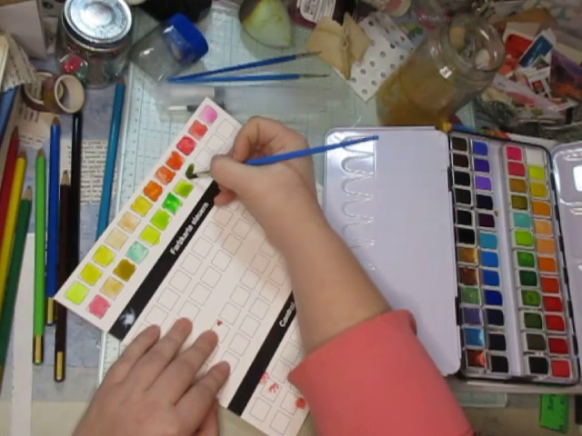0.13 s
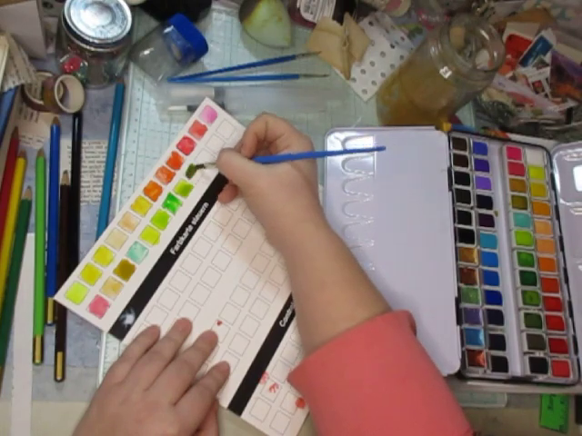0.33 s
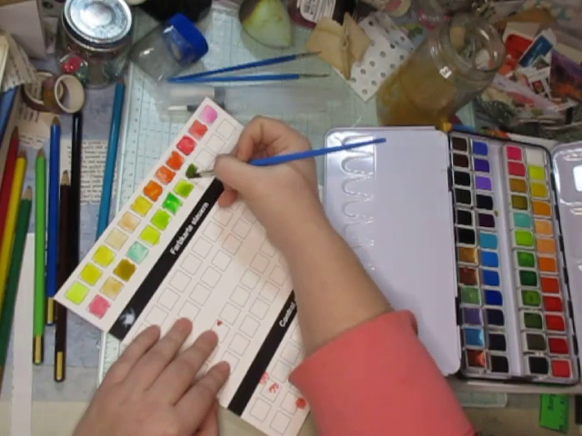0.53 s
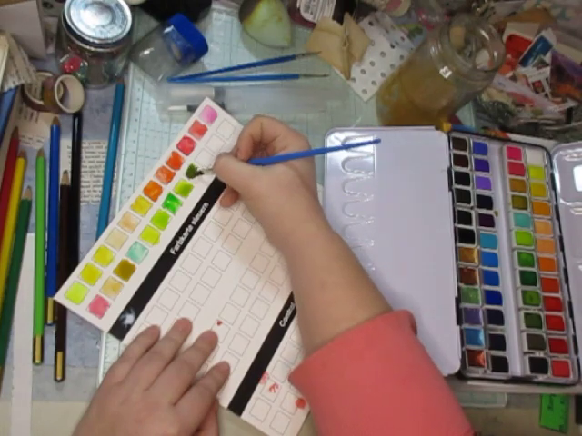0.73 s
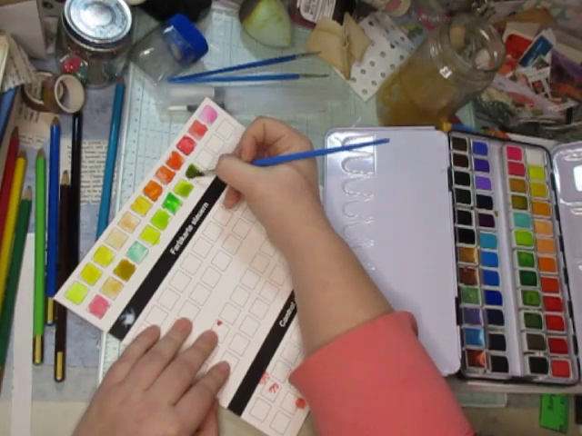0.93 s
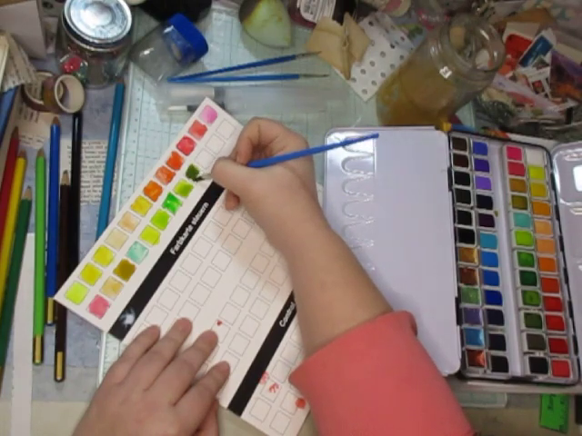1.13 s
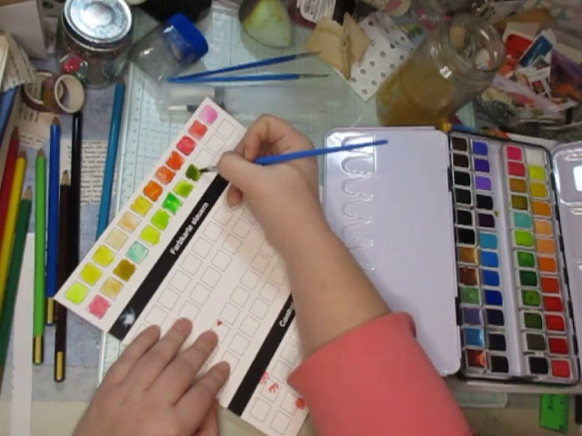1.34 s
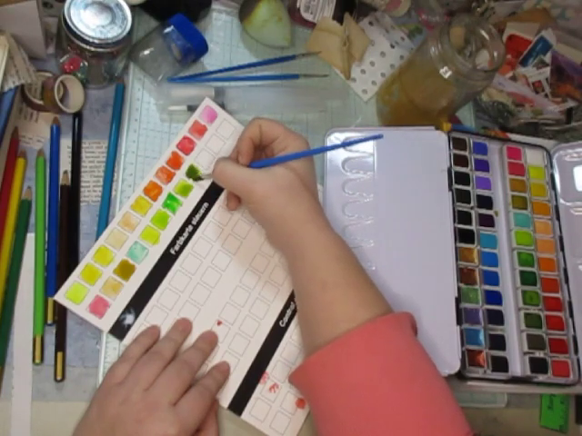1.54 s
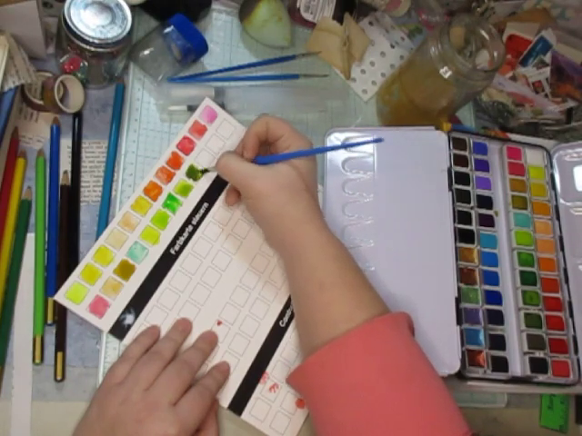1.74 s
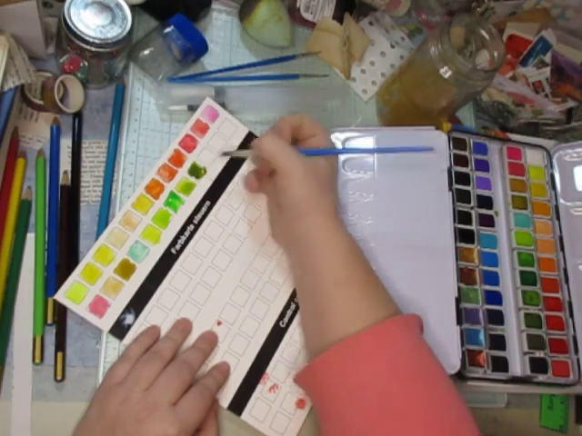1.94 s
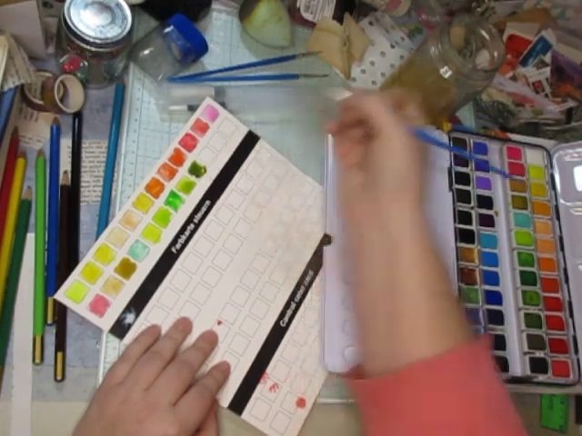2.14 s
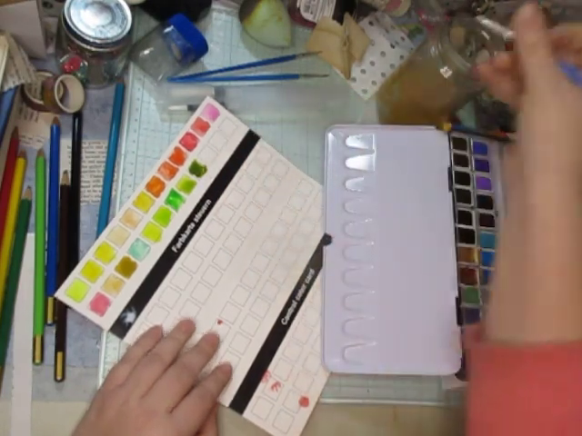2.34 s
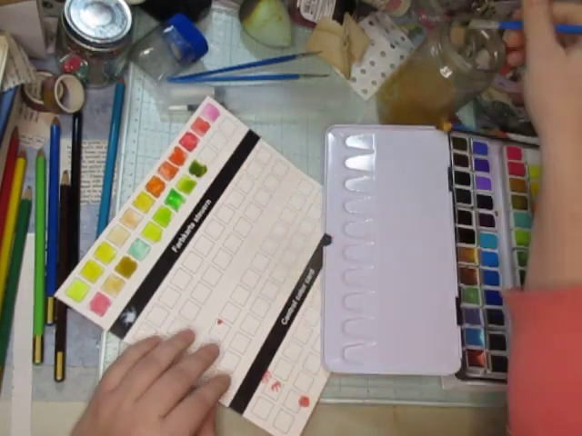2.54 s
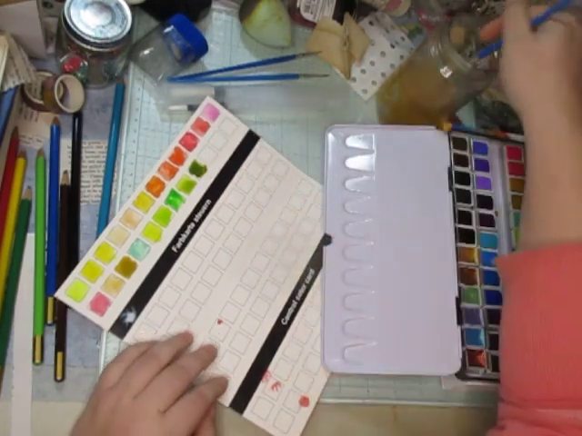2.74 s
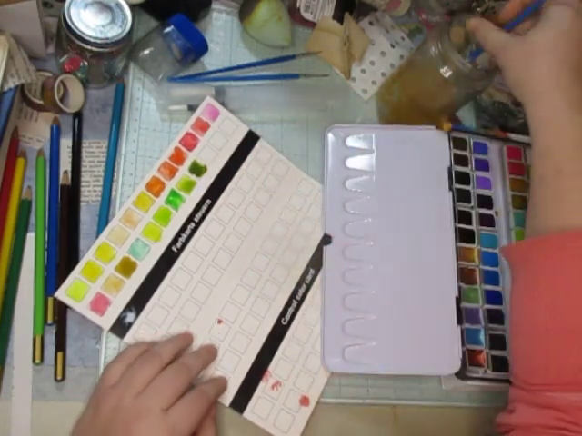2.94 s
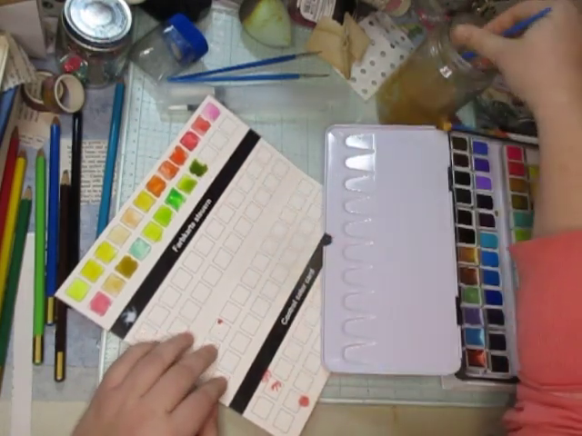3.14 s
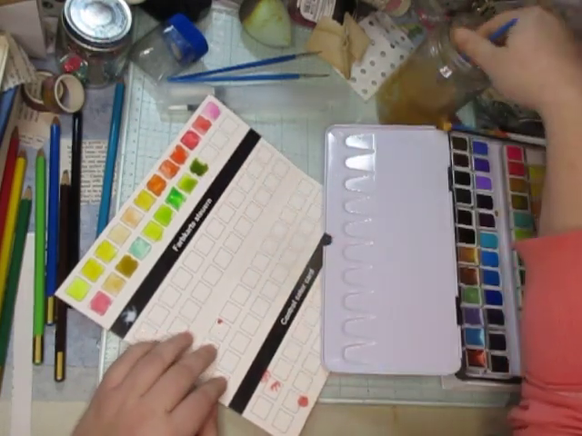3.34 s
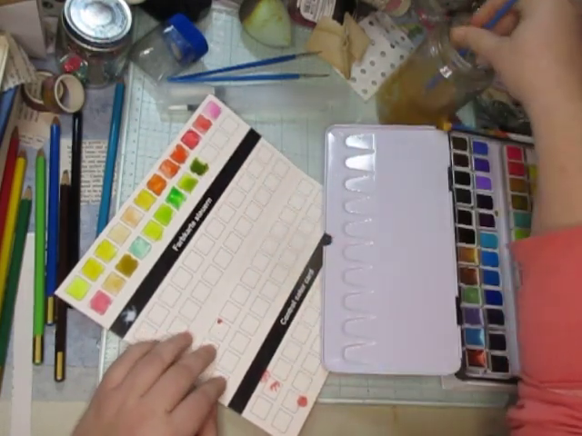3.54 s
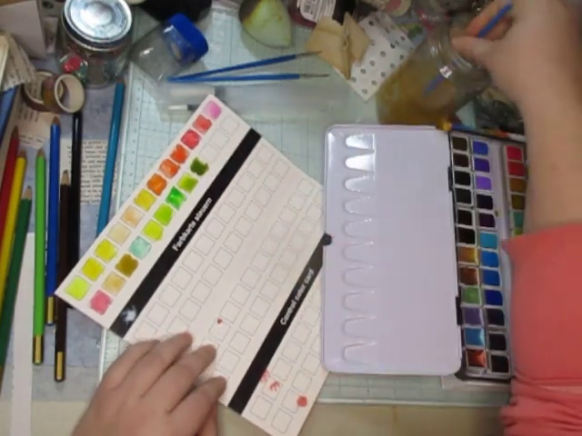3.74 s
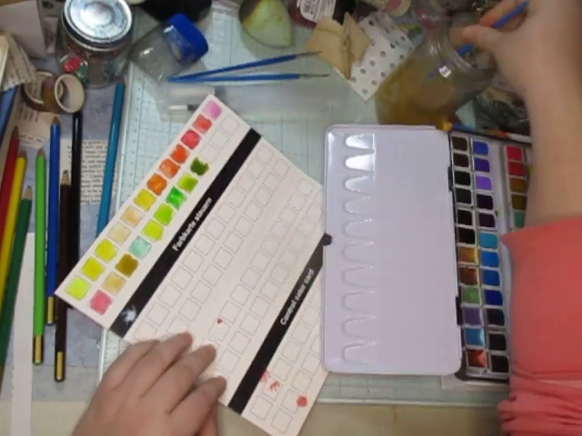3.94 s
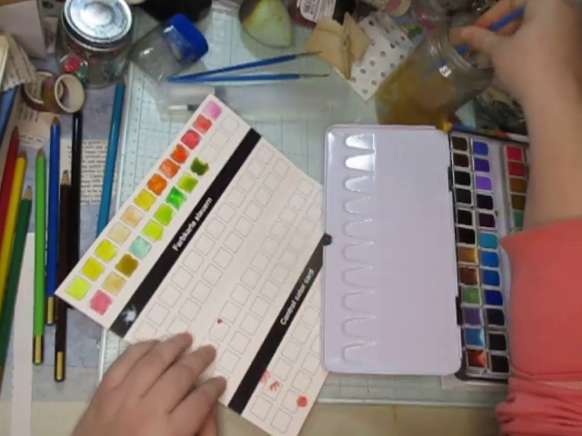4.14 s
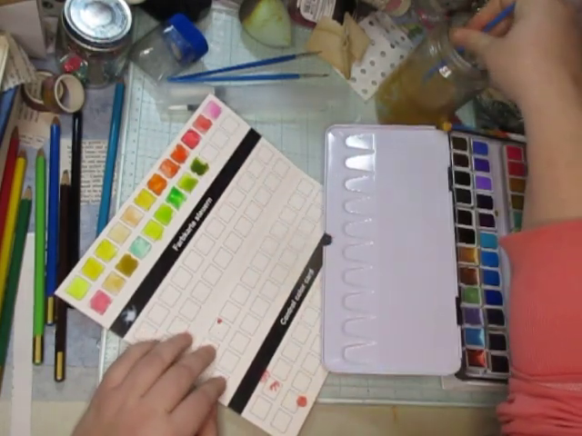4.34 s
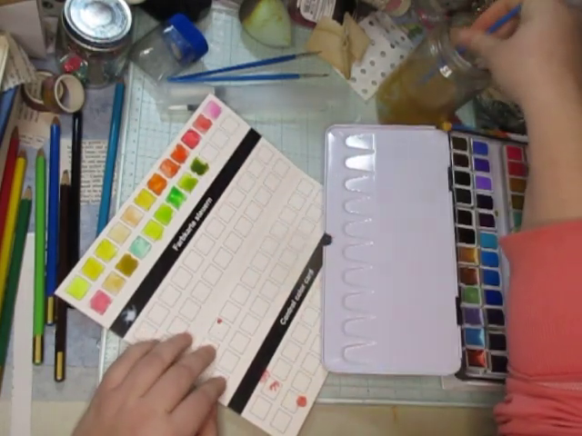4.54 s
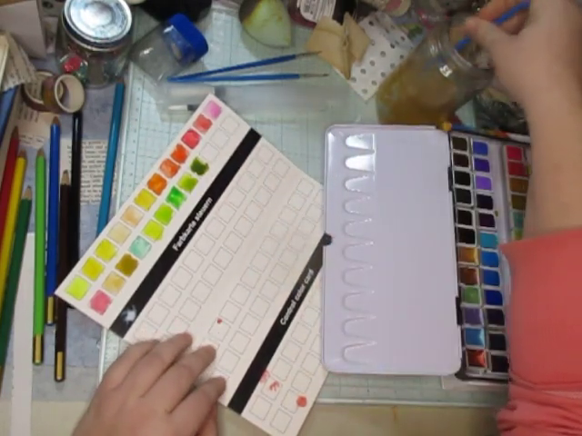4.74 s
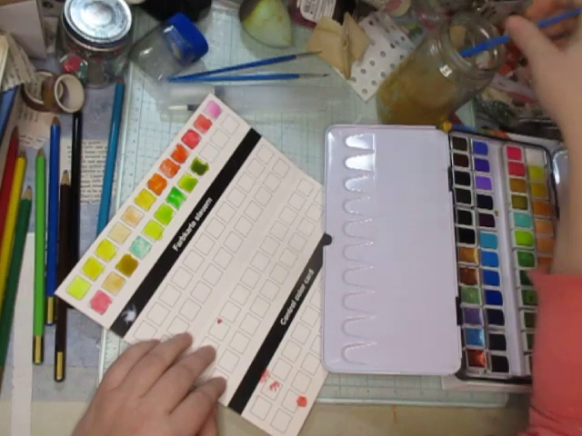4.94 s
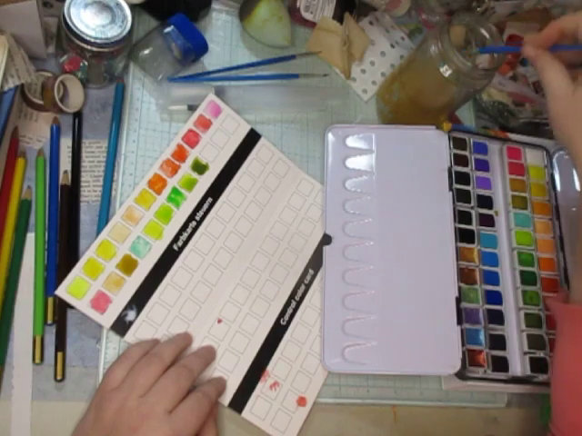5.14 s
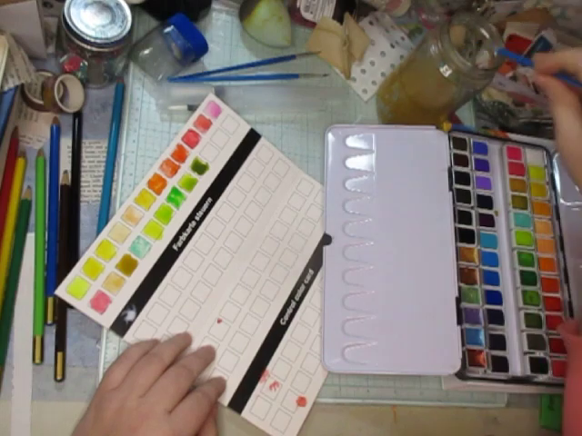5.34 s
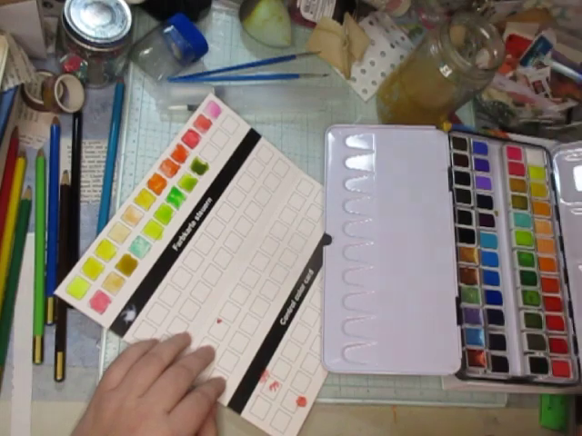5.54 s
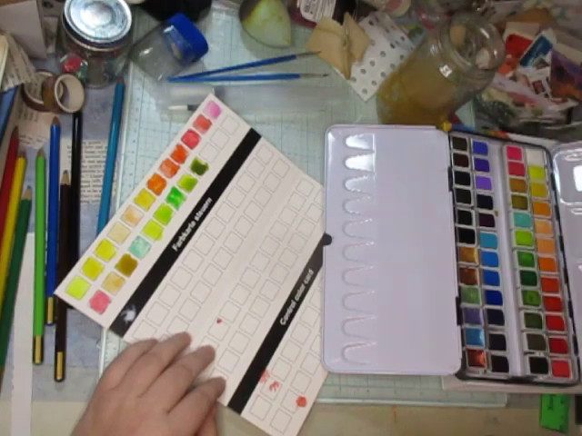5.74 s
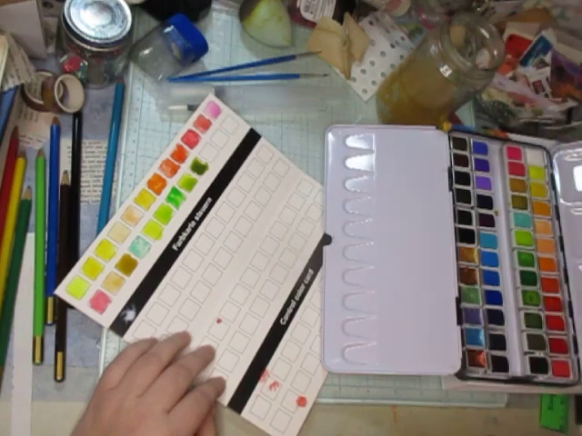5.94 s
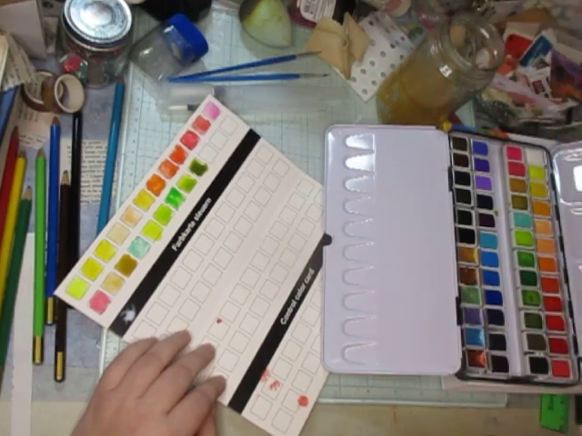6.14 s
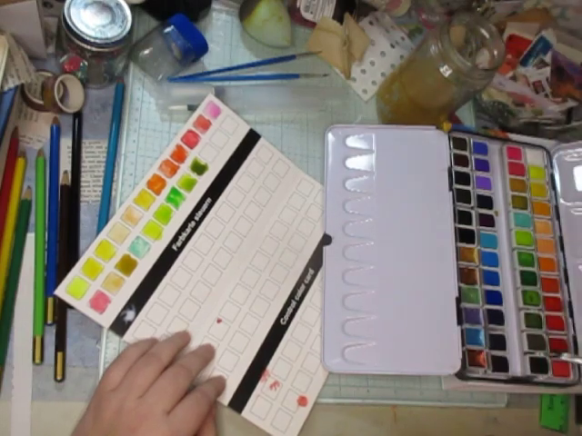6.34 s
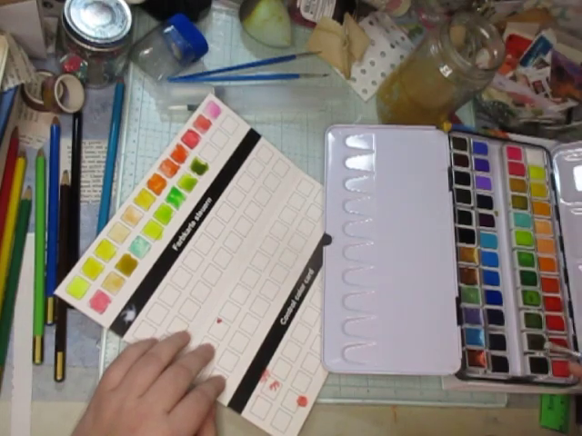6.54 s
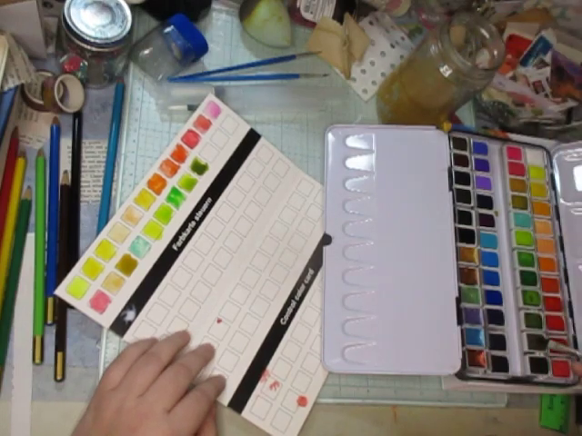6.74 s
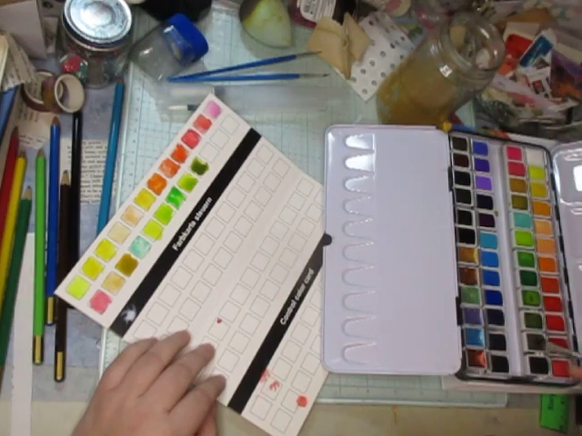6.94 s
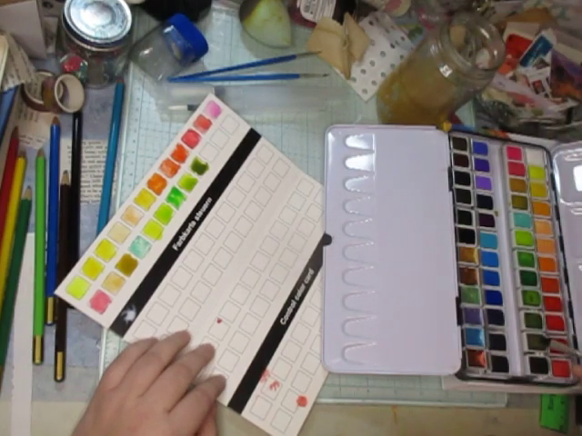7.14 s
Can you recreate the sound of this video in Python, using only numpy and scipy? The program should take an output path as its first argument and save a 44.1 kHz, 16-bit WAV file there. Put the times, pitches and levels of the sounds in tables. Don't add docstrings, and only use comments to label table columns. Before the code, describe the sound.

Over a steady fan whir and low electrical hum, a wooden brush handle knocks sharply inside a glass water jar, ending with one clear clink.

```python
import sys
import numpy as np
from scipy import signal
from scipy.fft import rfft, irfft
from scipy.io import wavfile
from scipy.ndimage import uniform_filter1d

SR = 44100
rng = np.random.default_rng(int(sys.argv[2]) if len(sys.argv) > 2 else 0)


def inscribe(sig):
    pcm = np.round(np.clip(np.atleast_2d(sig).T, -1, 1) * 32767)
    wavfile.write(sys.argv[1], SR, pcm.astype(np.int16))


def linear_from_db(decibels):
    return 10 ** (np.asarray(decibels, float) / 20)


N = 317816


def evened(x):
    return x / np.sqrt(np.mean(x ** 2) + 1e-20)


def read(points, hz):
    f, value = np.transpose(points)
    return np.interp(np.log(hz + 1), np.log(f + 1), value)


def add(mix, s, sound):
    part = mix[round(s * SR):][:len(sound)]
    part += sound[:len(part)]


def resonate(x, hz, width):
    turn = np.exp(2j * np.pi * np.cumsum(hz * np.ones(len(x))) / SR)
    r = np.exp(-np.pi * width / SR)
    smooth = signal.lfilter([1 - r], [1, -r], x / turn + 1e-18)
    return 2 * (turn * smooth).real


def coloured(points):
    hz = np.fft.rfftfreq(N, 1 / SR)
    spectrum = rfft(rng.standard_normal(N)) * linear_from_db(read(points, hz))
    return evened(irfft(spectrum, N))


def drift(top_hz):
    t = np.arange(0, N + 512, 512) / SR
    slow = 0
    for f in np.geomspace(top_hz / 20, top_hz, num=20):
        slow = slow + np.sin(2 * np.pi * (f * t + rng.random())) / np.sqrt(f)
    return np.interp(np.arange(N) / SR, t, evened(slow))


def ring(hz, db, t60, size, phase=0):
    t = np.arange(size)[:, None] / SR
    tones = linear_from_db(db - 60 * t / t60) * np.sin(2 * np.pi * hz * t + phase)
    return tones.sum(1)


def swish(rows, spread):
    s, db, hz = np.transpose(rows)
    t = np.arange(s[0], s[-1], 1 / SR)
    grain_db = 1.5 * evened(uniform_filter1d(rng.standard_normal(len(t)), size=90))
    rub = rng.standard_normal(len(t)) * linear_from_db(grain_db)
    for _ in range(2):
        rub = resonate(rub, np.interp(t, s, hz), spread * hz.mean())
    loudness = linear_from_db(np.interp(t, s, db))
    return s[0], loudness * evened(rub) * signal.windows.tukey(len(t), .2)


def fan():
    # (pitch [Hz], width [Hz], level [dB])
    housing = [(842, 59, -0.5), (998.5, 170, 4.5), (1204, 224, 6.5), (1422.4, 114, 4.5), (1658, 105, -1),
               (2025, 18, -12), (359.5, 5.7, -15), (706.5, 22, -14)]
    # (frequency [Hz], level [dB])
    rumble = [(20, -1), (48, -1.5), (59, 4), (70, -4), (100, -1), (150, -4), (250, -7.5), (550, -13.5),
              (900, -9), (2300, -28), (4000, -43)]
    air = rng.standard_normal(N)
    whir = np.zeros(N)
    for hz, width, db in housing:
        width = 1.21 * width
        hollow = resonate(resonate(air, hz, width), hz, width)
        whir += linear_from_db(db) * evened(hollow)
    whir_db = -47 + 0.15 * drift(5.9)
    return linear_from_db(whir_db) * evened(whir) + linear_from_db(-52) * coloured(rumble)


def hum():
    # (frequency [Hz], level [dB rms])
    hum_tones = [
        (119.95, -39.7),
        (15734.04, -87.3),
        (15747.5, -91),
    ]
    t = np.arange(N) / SR
    tones = np.zeros(N)
    for hz, db in hum_tones:
        tones += linear_from_db(db) * np.sqrt(2) * np.sin(2 * np.pi * hz * (t - .052))
    return tones * linear_from_db(0.16 * drift(2.3))


def lens_motor():
    # (frequency [Hz], decay time t60 [s], level [dB])
    tick_tones = [(1500, .007, 0), (2200, .004, -2), (2850, .009, -3), (3800, .0025, -2), (5300, .0025, -3),
                  (6800, .003, -4), (8500, .002, -7)]
    # (time of second step [s], gap after the first [s], peak level [dB])
    focus_runs = [
        (.131, .041, -44),
        (.399, .048, -42),
        (2.7001, .047, -41.5),
        (3.3014, .042, -42),
    ]
    # (delay [s], delay [s])
    run_delays = (.025, .066)
    # (first [dB], second [dB], third [dB], fourth [dB])
    run_levels = (-.5, -.5, -.5, -1.5)
    # (time [s], peak level [dB])
    steps = [
        (2.4334, -50),
        (2.467, -47),
        (2.82, -50),
        (2.8334, -47),
        (2.8494, -43),
        (2.933, -45),
        (3.234, -40),
        (3.509, -42.5),
    ]
    hz, t60, db = np.transpose(tick_tones)
    tick = ring(hz, db, t60, size=900)
    tick = tick / abs(tick).max()
    out = np.zeros(N)
    for s, gap, peak_db in focus_runs:
        for delay, more_db in zip((-gap, 0, *run_delays), run_levels):
            add(out, s + delay, linear_from_db(peak_db + more_db + 8.0) * tick)
    for s, peak_db in steps:
        add(out, s, linear_from_db(peak_db + 8.0) * tick)
    return out


def brush_strokes():
    # (time of the middle [s], peak level [dB], resonance [Hz])
    strokes = [
        (.25, -69, 5200),
        (.77, -70, 5200),
        (1.27, -68, 5270),
        (1.72, -67, 5250),
        (1.96, -68, 8500),
    ]
    half_s, ends_db = .09, -6
    out = np.zeros(N)
    for s, db, hz in strokes:
        rows = [(s - half_s, db + ends_db, hz), (s, db, hz), (s + half_s, db + ends_db, hz)]
        add(out, *swish(rows, .17))
    return out


def sloshes():
    # (start [s], length [s], peak level [dB], first pitch [Hz], last pitch [Hz])
    pushes = [
        (2.815, 0.066, -60, 2800, 3200),
        (3.6, 0.49, -54.5, 420, 520),
        (4.017, 0.11, -56, 2650, 3400),
        (4.509, 0.046, -39.5, 2540, 3400),
        (4.535, .024, -61, 4500, 4700),
        (4.604, 0.084, -51, 3320, 2200),
        (4.646, 0.05, -47.5, 2250, 3560),
    ]
    rise = 0.26
    out = np.zeros(N)
    for s, length, db, from_hz, to_hz in pushes:
        start = (s, db - 6, from_hz)
        top = (s + rise * length, db, from_hz + rise * (to_hz - from_hz))
        end = (s + length, db - 16, to_hz)
        add(out, *swish([start, top, end], 0.32))
    return out


def clatter(mode_hz, mode_db, size):
    # (frequency [Hz], level [dB])
    colour = [(150, 0), (300, -2), (600, 2.5), (1000, -3), (2200, -8), (4300, 1), (4800, -3), (8000, -1),
              (11000, -4), (15000, -26)]
    # (frequency [Hz], decay time t60 [s])
    decay = [(150, 0.47), (500, 0.23), (1500, 0.49), (2600, 0.14), (4000, 0.15), (6000, 0.062),
             (12000, 0.057)]
    hz, t, z = signal.stft(rng.standard_normal(size), SR, nperseg=256, noverlap=224)
    colour_db = read(colour, hz) + np.interp(hz, mode_hz, uniform_filter1d(mode_db, size=5))
    z = z * linear_from_db(colour_db[:, None] - 60 * t / read(decay, hz)[:, None])
    return signal.istft(z, SR, nperseg=256, noverlap=224)[1][:size]


def wood_crack(t):
    u = t * 1500 - 1.3
    crack = np.exp(-3.5 * u ** 2) * (np.sin(2 * np.pi * u) + 0.59 * np.sin(2 * np.pi * 2.15 * u))
    crack = crack + linear_from_db(-13) * np.roll(crack, round(.0033 * SR))
    return crack / crack.max()


def knock(side, ring_db, rise_ms, dull_db, crack_db):
    # (frequency [Hz], decay time t60 [s], mean
    # level [dB], swing of the level with the side struck [dB], loudest side [turns])
    table_top = [
        (303, .17, -6.5, 8, .66),
        (433, .18, -18, 20, .26),
    ]
    jar_modes = [(630, .07, -6.5, 5.5, .68), (752, .16, -2.5, 8.5, .25), (825, .08, -13, 15.5, .25),
                 (940, .13, -5.5, 4.5, .64), (1038, .14, -6, 3, .2), (1165, .1, -8.5, 13, .89),
                 (1205, .08, -8, 2.5, .8), (1290, .08, -10.5, 4, .9), (1473, .12, -13.5, 7, .78),
                 (1527, .14, -7, 6.5, .98), (1600, .12, -7.5, 1.5, .9), (1782, .14, -13, 4.5, .4),
                 (1880, .11, -13, 3, .5), (2165, .11, -11.5, 7, .69),
                 (2390, .07, -28, 9.5, .55), (2478, .07, -22, 9, .73), (2820, .07, -13, 1.5, .75),
                  (3079, .13, -17.5, 1.5, .4), (3365, .09, -21, 1.5, .04), (3749, .11, -28, 7.5, .81),
                  (4080, .1, -27.5, 6, .55), (4272, .08, -27.5, 4.5, .2), (5373, .13, -37, 5, .5),
                  (6188, .12, -38.5, 5, .27), (6691, .09, -38, 1, .54), (7497, .08, -36.5, 7.5, .3),
                  (8188, .08, -40.5, 5.5, .26), (8965, .07, -44, 6, .3)]
    hz, t60, mean_db, swing_db, loudest = np.transpose(table_top + jar_modes)
    levels = mean_db + swing_db * np.cos(2 * np.pi * (side - loudest))
    t = np.arange(12000) / SR
    phase = 2 * np.pi * rng.random(len(hz))
    table = hz < 500
    glass = ring(hz[~table], levels[~table], t60[~table], size=len(t), phase=phase[~table])
    boom = ring(hz[table], levels[table] + 4.0, 1.13 * t60[table], size=len(t), phase=phase[table])
    boom *= 1 - np.exp(-t / 0.0012)
    rattle = clatter(hz, levels, size=len(t))
    first = SR // 100
    glass = glass + linear_from_db(-7) * rattle * np.std(glass[:first]) / np.std(rattle[:first])
    early_burst = 1 + 2.65 * np.exp(-t / 0.0052)
    onset = 1 - np.exp(-(1000 * t / rise_ms) ** 2)
    body = (glass * early_burst + boom) * onset
    f = np.fft.rfftfreq(16384, 1 / SR)
    dullness = linear_from_db(-dull_db * np.log2(1 + f / 600))
    body = irfft(rfft(body, 16384) * dullness)[:len(t)]
    return linear_from_db(ring_db) * body / np.std(body[:first]) + linear_from_db(crack_db) * wood_crack(t)


def nudges():
    # (time [s], ringing level [dB rms], side struck [turns], dullness [dB per octave])
    soft_touches = [
        (2.849, -41.5, 0.49, 10),
        (2.866, -46.5, 0.32, 13),
        (3.2413, -42.5, 0.45, 18),
        (3.255, -56, 0.26, 19),
        (3.816, -44.5, 0.46, 18),
        (3.874, -52, .54, 10),
        (3.922, -39.5, 0.8, -4),
        (4.652, -47, 0.7, -2),
    ]
    out = np.zeros(N)
    for s, ring_db, side, dull_db in soft_touches:
        add(out, s, knock(side, ring_db, 3.4, dull_db, -np.inf))
    return out


def clink(peak_db, dull_db):
    rim_hz = [3252, 3269, 5335, 5378, 6110, 8484, 8540, 10390, 11510]
    # (level [dB], decay time t60 [s])
    rim_tones = [(0, .065), (-19, .33), (-13, .17), (-15, .13), (-21, .14), (-23, .13), (-28, .1),
                 (-33, .07), (-28, .13)]
    hz = np.array(rim_hz)
    db, t60 = np.transpose(rim_tones)
    rim = ring(hz, db - dull_db * np.log2(np.minimum(hz, 5400) / 3000), t60, size=12000)
    rim = rim * (1 - np.exp(-np.arange(12000) / 60.))
    tick = ring(np.array([4200, 5600, 7200, 10000]), np.array([-14, -16, -23, -20]), 0.0081, size=12000)
    return linear_from_db(peak_db) * (rim / abs(rim).max() + tick)


def clinks():
    # (time [s], peak level [dB], dullness [dB per octave])
    rim_touches = [
        (3.822, -55, 4),
        (4.247, -51, -10),
        (4.457, -52, -7),
        (4.537, -50, -10),
        (4.872, -57, 4),
        (5.3415, -29.5, .1),
    ]
    out = np.zeros(N)
    for s, peak_db, dull_db in rim_touches:
        add(out, s, clink(peak_db, dull_db))
    return out


def knocks():
    # (time [s], ringing level [dB rms], side struck [turns], dullness [dB per octave], crack peak level [dB])
    handle_hits = [(3.855, -35, 0.52, 7, -59), (3.896, -34.5, 0.41, 6.5, -43), (3.927, -32, 0.49, 0.5, -30),
                   (3.94, -40.5, .38, 0, -50), (3.9968, -17.5, .47, -2.8, -13),
                   (4.1857, -28, 0.47, -1, -27), (4.196, -18, .54, -4.2, -3),
                   (4.2537, -21, .07, -1.5, -10.5), (4.2588, -26, .07, -.5, -13),
                   (4.3064, -31.5, 0.44, 2.5, -35), (4.3114, -30, 0.42, -0.5, -31),
                   (4.509, -35.5, 0.54, -0.5, -43), (4.555, -24.5, 0.4, 2, -42),
                   (4.5588, -16.5, .66, -5.9, .3), (4.605, -33.5, 0.14, 7, -29)]
    out = np.zeros(N)
    for s, ring_db, side, dull_db, crack_db in handle_hits:
        add(out, s, knock(side, ring_db, 1.65, dull_db, crack_db))
    return out


def jar():
    out = sloshes() + nudges() + clinks() + knocks()
    return signal.sosfilt(signal.butter(2, 90., "high", fs=SR, output="sos"), out)


def scene():
    return (fan() + hum() + lens_motor() + brush_strokes() + jar())[None]


def hiss():
    # (frequency [Hz], level [dB per Hz])
    hiss_colour = [(1350, -54), (2300, -3.5), (3070, 1), (4140, -1.5), (7510, -3), (8340, -3),
                   (12900, -11.5), (14800, -15), (15800, -23)]
    return linear_from_db(-61.5) * coloured(hiss_colour)


def add_sensor_whine(x):
    whine_hz, frames_per_s = 7867, 29.97
    t = np.arange(N) / SR
    frame = (t + 0.02) * frames_per_s
    sign = 1 - 2 * (frame // 1 % 2)
    blips = sign * np.exp(-(frame % 1) / .1) * np.sin(2 * np.pi * whine_hz * t)
    return signal.lfilter(*signal.iirnotch(whine_hz, 40., SR), x) + linear_from_db(-65) * blips


def gain_control(x):
    level_db = 20 * np.log10(abs(uniform_filter1d(abs(x[0]), 44)) + 1e-9)
    over_db = 0.85 * np.maximum(level_db + 13, 0)
    recovery_db = np.arange(N) / SR * 4.5
    cut_db = np.maximum.accumulate(over_db + recovery_db) - recovery_db
    return x / linear_from_db(signal.lfilter([.0006], [1, -.9994], cut_db))


def band_limit(x):
    return signal.sosfilt(signal.butter(12, 15780, fs=SR, output="sos"), x)


def record(dry):
    x = add_sensor_whine(dry + hiss())
    x = gain_control(x)
    x = signal.oaconvolve(x, signal.firwin(801, 15850, fs=SR)[None], "same")
    x = np.tanh(x / 1.3) * 1.3
    return band_limit(x)


dry = scene()
out = record(dry)
inscribe(out)
```